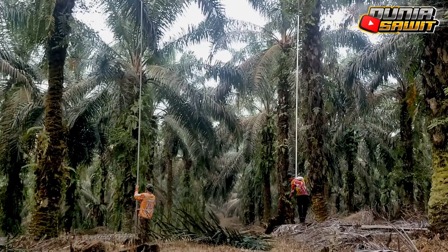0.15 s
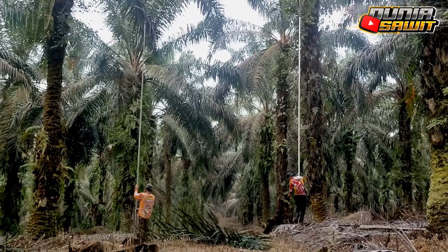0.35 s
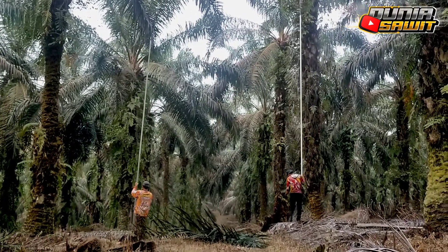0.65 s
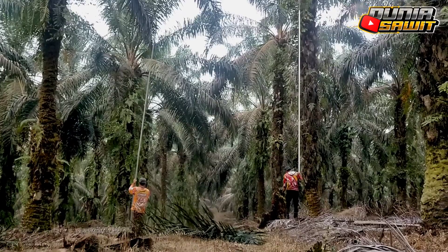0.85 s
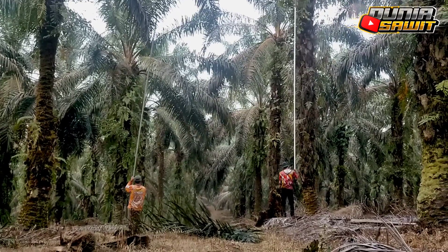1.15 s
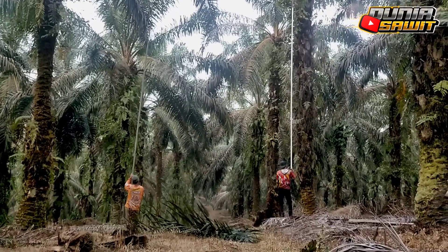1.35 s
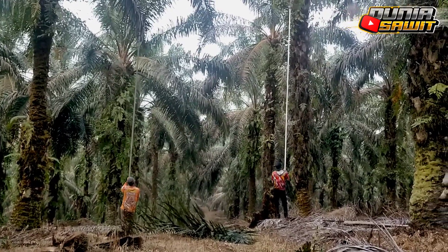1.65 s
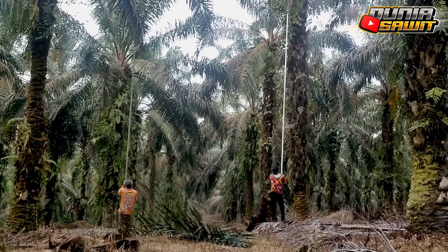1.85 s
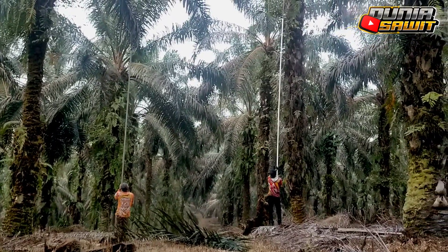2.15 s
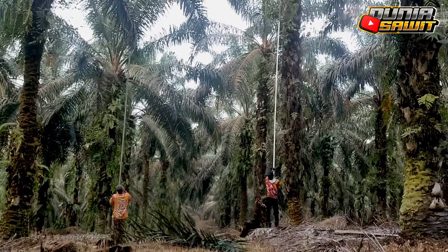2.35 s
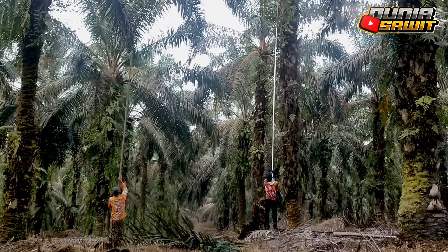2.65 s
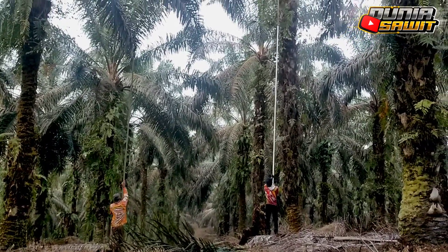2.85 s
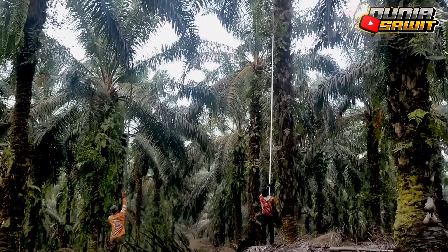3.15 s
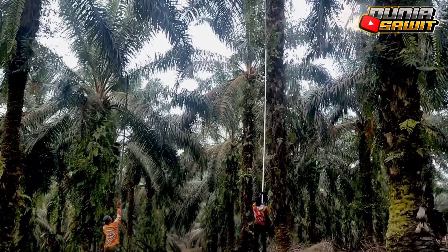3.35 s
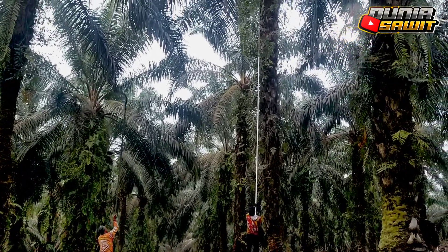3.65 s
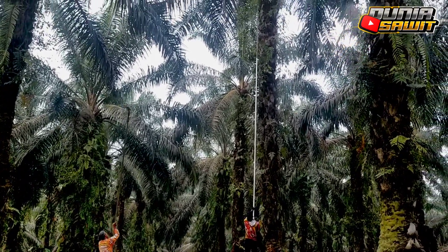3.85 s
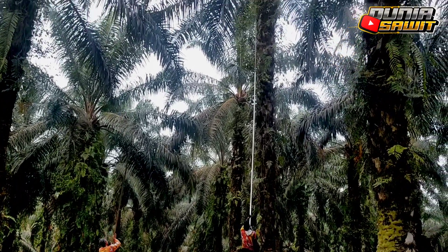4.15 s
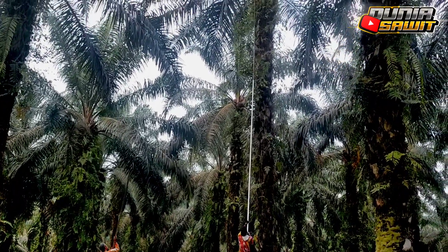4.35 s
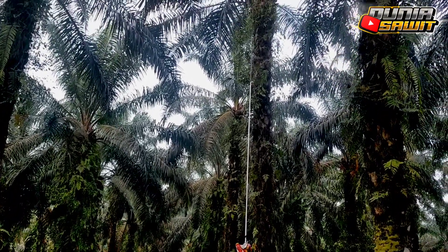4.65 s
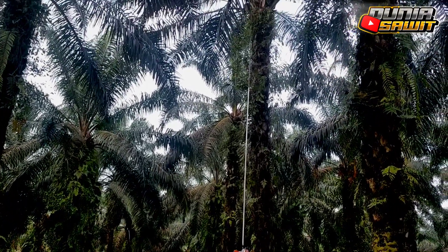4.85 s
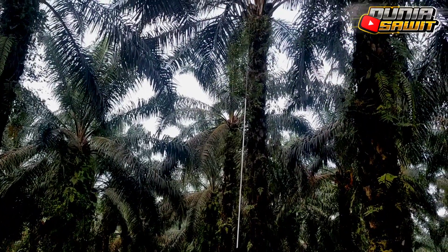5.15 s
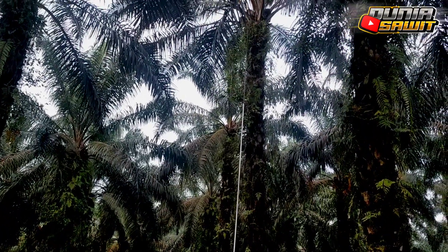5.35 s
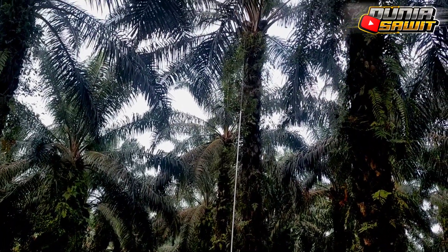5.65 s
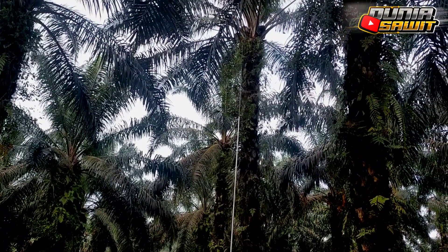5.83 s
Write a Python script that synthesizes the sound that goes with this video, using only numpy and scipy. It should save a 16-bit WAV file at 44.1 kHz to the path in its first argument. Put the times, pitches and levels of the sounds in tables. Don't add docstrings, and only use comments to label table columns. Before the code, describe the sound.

Outdoor recording among tall trunks: first a long bright scrape of steel on leaves with tiny clinks and a bird's rapid trill, then a quieter gap with microphone pops. At about two seconds a sharp chop cracks and shivers metallically. Afterwards come bird chirps, soft rasping pulls, a woody creak with taps, and hard knocks near the end, all over continuous insect buzzing.

```python
import sys
import numpy as np
from scipy import signal
from scipy.fft import rfft, irfft, next_fast_len
from scipy.io import wavfile
from scipy.ndimage import uniform_filter1d

SR = 44100
rng = np.random.default_rng(int(sys.argv[2]) if len(sys.argv) > 2 else 0)


def wav_out(sig):
    wavfile.write(sys.argv[1], SR, np.round(np.clip(np.atleast_2d(sig).T, -1, 1) * 32767).astype(np.int16))


def volts_from_db(level):
    exponent = np.asarray(level, float) / 20
    return 10 ** exponent


N = 264159

# frequency in Hz, level in dB per Hz.
AIR_SPECTRUM = [(30, -8), (59, -7.5), (120, -3.5), (190, -12), (469, -24), (1140, -23.5), (1500, -24.5),
                (2360, -21.5), (2900, -23.5), (3800, -24), (6500, -32), (8200, -31), (11000, -38.5),
                (15500, -35)]
AIR_DB = -64
# start in seconds, hold in seconds, level in dB.
GUSTS = [
    (0.156, 0.55, -62),
    (.9, .03, -61),
    (1.418, .01, -57.5),
    (1.942, 0.3, -59),
    (2.994, 0.49, -61),
    (5.147, .01, -60.5),
    (5.49, .01, -62.5),
]
LULL_DB, GUST_RISE, GUST_FALL = -67, 54, 75
# centre in Hz, width in Hz, level in dB.
CHORUS_BANDS = [(4430, 600, -0.5), (5060, 990, -1), (5560, 1080, -4)]
# frequency in Hz, level in dB.
CHORUS_EDGE = [(3300, -6), (3950, -6), (4200, 0), (7000, -0.5)]
# time in seconds, level in dB.
CHORUS_SWELL = [(0, -63), (1, -65), (1.5, -65.5), (2.3, -64), (3, -65.5), (3.5, -64.5), (4, -66),
                (4.6, -65), (5.2, -67), (6, -66.5)]

# time in seconds, level in dB under its peak.
LONG_PULL = [
    (0, -8),
    (.12, -2),
    (.3, -3),
    (.432, -4),
    (.58, 0),
    (.65, -3.5),
    (.71, -9),
    (.745, -18.5),
    (.9, -34),
]
# leaf hiss, blade ring and stem rasp in dB.
LONG_PULL_PEAKS = (-51.5, -52, -61.5)
# start in seconds, length in seconds, hiss, ring and rasp in dB.
PULLS = [(0.028, 0.14, -75, -70, -58.5), (.46, .12, -75, -70, -58), (.8, 0.079, -76, -73, -70.5),
         (1.3, 0.14, -74.5, -69.5, -81), (1.696, 0.34, -63.5, -63.5, -65.5), (2.578, 0.14, -80, -86, -71.5),
         (2.96, .14, -74, -84, -78), (3.5, .08, -79, -88, -68), (3.586, 0.042, -71, -82, -62.5),
         (3.625, 0.036, -56, -72, -53.5), (4.27, 0.19, -74, -79, -75), (4.68, 0.14, -76.5, -84, -71.5)]
CLIMB_DB, LET_GO = 6.5, 97
# start in seconds, hiss, ring and rasp in dB, fade in dB per second.
JOLTS = [
    (2.747, -70, -77, -64, 43),
    (3.69, -66, -68, -56.5, 92),
    (4.5, -76, -77, -68, 34),
    (5.228, -67, -76, -62.5, 130),
    (5.846, -80, -86, -66, 300),
    (5.897, -83, -84, -57, 92),
]
JOLT_S = 0.4
RING_FOLLOW, RASP_FOLLOW = 0.94, .6
# frequency in Hz, level in dB per Hz.
HISS_SPECTRUM = [(2000, -32), (3300, -8), (5000, -3), (6800, -6), (8300, -1), (10200, -6), (12700, -1.5),
                 (15500, 2.5)]
# frequency in Hz, level in dB per Hz.
RASP_SPECTRUM = [(200, -15), (500, -14), (1100, -7.5), (1600, -3.5), (2300, -0.5), (2900, -2), (3600, -2.5),
                 (5000, -16)]

# start in seconds, end in seconds, seconds between pairs, level in dB.
TRILLS = [
    (.032, .51, .0502, -54.5),
    (0.533, .93, .0517, -55),
    (1.584, 1.93, .0519, -54.5),
    (2.871, 3.33, .0519, -53.5),
]
# start in seconds, level in dB.
STRAYS = [
    (.001, -55),
    (.626, -59),
    (3.316, -52),
    (3.358, -52),
    (3.371, -53),
]
PAIR_GAP_S, PAIR_LEAD_DB = .0146, -2.5
UNEVEN_DB, UNEVEN_PITCH = 1.5, .01
# start in seconds, end in seconds, level in dB.
PHRASES = [
    (0.029, .4, -57.5),
    (2.331, 3.83, -56),
]
TRIPLE_S, TRIPLE_GAP_S, TRIPLE_LEAD_DB = .2385, .0397, -8
OVERTONE_DB, LEAD_OVERTONE_DB = -26, -14
# start in seconds, level in dB, first pitch in Hz, last pitch in Hz, length in seconds.
NOTES = [(1.0, -61, 2540, 2480, 0.022), (1.045, -71, 1780, 1500, 0.047), (1.07, -65, 4000, 3600, 0.019),
         (1.349, -66.5, 1773, 1470, 0.038), (2.566, -63, 1060, 1030, .032), (2.78, -58, 1130, 1210, .026),
         (2.762, -64, 850, 900, .03), (2.512, -66, 2330, 2500, .038), (2.68, -69, 6100, 6500, 0.049),
         (2.71, -66, 5900, 6700, 0.052), (2.811, -61, 3840, 3850, 0.017), (2.828, -62, 3900, 3850, .012),
         (3.062, -60, 2760, 2790, 0.023), (2.82, -68, 3100, 3080, 0.015), (4.03, -61.5, 2800, 2630, 0.022),
         (4.118, -64, 3130, 2970, 0.03), (1.755, -62, 2800, 2810, 0.025), (1.78, -63.5, 2830, 2830, 0.047),
         (1.888, -59, 2870, 2830, 0.038), (4.355, -68, 6200, 6500, 0.038), (4.4, -68, 5900, 6600, .045),
         (4.948, -67, 6100, 6800, 0.073), (5.024, -68, 5960, 6730, 0.039), (5.234, -59.5, 875, 833, 0.066),
         (5.288, -59, 1000, 1190, .04), (2.171, -55, 6120, 4580, 0.031)]
# frequency in Hz, t60 in seconds.
GROVE_DECAY = [(300, .3), (790, .45), (2090, .58), (5510, .6), (9000, .5), (13000, .3)]

# start in seconds, level in dB, pitch in Hz, t60 in seconds.
CLINKS = [(.008, -54, 2850, .1), (.0368, -50.5, 2910, .08), (.0643, -54, 2910, .08),
          (.075, -55.5, 2460, .2), (.09, -55, 2900, .08), (.128, -54, 2240, .06), (0.143, -52, 2800, 0.15),
          (.155, -53, 1650, 0.076), (.305, -58, 1050, 0.049), (.4065, -52, 2240, .05),
          (.463, -56, 2600, 0.091), (.5387, -53, 2850, .08), (.5387, -51.5, 2230, 0.13),
          (.539, -53.5, 1150, 0.09), (.582, -58, 2840, .12), (.592, -52, 2140, .06), (.636, -57, 2900, .12),
          (.66, -50, 2900, 0.076), (.694, -53.5, 2870, .08), (2.138, -43.5, 2840, 0.069),
          (2.313, -57, 2830, .1), (2.645, -57, 2850, 0.06), (2.7, -60, 2800, .06), (2.7, -61, 2750, .08),
          (2.7, -58.5, 693, 0.086), (2.7, -54, 1490, .05), (2.75, -55, 2820, .05),
          (2.785, -60.5, 450, 0.093), (2.911, -64, 2100, .08), (3.655, -44, 960, .03),
          (3.591, -60, 1200, .08), (3.714, -54, 2300, .1), (5.9, -59, 3800, .15), (5.906, -62, 6600, .15),
          (5.943, -58, 3400, .1), (5.853, -58, 1650, .06), (5.918, -58, 1600, .2), (5.93, -56, 3030, .04),
          (5.944, -56, 3000, .04), (5.955, -57, 3000, .08), (1.962, -38.5, 760, .06), (.537, -57, 600, .05),
          (1.702, -60, 603, .06)]
CLINK_ROUGH, CLINK_WIDTH = .55, 220
# start in seconds, hold in seconds, level in dB, pitch in Hz.
FAR_WHISTLES = [(.9, .02, -68, 2510), (1.463, 0.024, -70.5, 2340), (2.5, 0.046, -70, 2360),
                (3.02, 0.081, -67.5, 2340), (3.425, .07, -65, 2330), (3.54, .02, -71, 2200),
                (3.87, 0.079, -67, 2350), (4.236, 0.1, -67.5, 2360), (4.927, 0.034, -66, 2375),
                (5.13, .01, -80, 2390), (5.58, 0.11, -70.5, 2360), (5.79, .04, -81, 2420)]
# start in seconds, hold in seconds, level in dB, pitch in Hz.
THIN_WHISTLES = [
    (.8, .2, -74, 3650),
    (5.158, 0.16, -72.5, 3670),
]
FAR_RISE, FAR_FALL = 180, 140
FAR_WANDER = .018
# start in seconds, peak in dB, brightness in Hz.
SNAPS = [(.841, -48, 10500), (1.0494, -51, 10500), (1.079, -42.5, 7350), (1.375, -54, 9000),
         (1.703, -54, 9000), (1.961, -28, 11000), (2.75, -46.5, 8000), (1.948, -32, 11000),
         (1.953, -33, 12000), (1.958, -34, 9500), (1.9642, -32, 8000), (1.968, -35, 13000),
         (2.7806, -50, 11000), (3.5932, -56, 11000), (3.6157, -48, 11000), (3.63, -45, 10000),
         (3.7319, -48, 11000), (3.777, -52, 9000), (3.93, -58, 11000), (4.5506, -54, 11000),
         (5.2699, -51, 11000), (4.298, -56, 10000), (4.4178, -51, 10000), (4.4932, -47.5, 8000),
         (4.7855, -54, 10000), (5.236, -49, 12000), (5.3296, -43, 6000), (5.3305, -46, 4000),
         (2.795, -52, 5000), (2.818, -53, 6000), (2.974, -57, 10000), (5.851, -57, 10000),
         (5.904, -51, 12500), (5.9863, -39, 9000)]
# start in seconds, peak in dB, rate of swing in Hz.
POPS = [(1.115, -38.5, 1330), (1.11578, -45, 1300), (1.1185, -53, 700), (1.28, -58, 708), (2.326, -56, 425),
        (3.279, -39, 1290), (3.958, -39, 1120), (4.066, -49, 1050), (4.191, -51.5, 1050),
        (5.1341, -39.5, 1400), (5.1366, -50, 700), (5.4338, -52, 900), (5.4358, -45.5, 937),
        (5.4648, -38.5, 1370), (3.0595, -58, 1500), (5.9851, -41, 1500), (5.985, -40, 5500)]
# start in seconds, hold in seconds, level in dB, resonance in Hz, roughness 0-1.
CREAKS = [(1.663, .004, -72, 700, 0.2), (2.69, 0.041, -67, 790, 0.55), (2.781, 0.013, -64, 1144, 0.5),
          (3.61, .008, -61, 1080, .4), (3.62, 0.014, -54, 1060, 0.44), (3.642, 0.035, -49, 1130, 0.3),
          (3.711, .006, -63, 1010, .4), (4.461, 0.011, -65, 1100, .1), (4.505, 0.014, -58.5, 1020, .6),
          (4.525, 0.0095, -53.5, 960, 0.66), (5.329, 0.098, -66, 1070, 0.2)]
CREAK_RISE, CREAK_FALL = 630, 820
CREAK_WANDER = .05
# start in seconds, level in dB, centre in Hz, width in Hz, t60 in seconds.
SCUFFS = [(1.698, -56, 1200, 830, 0.2), (1.799, -61, 1000, 1600, 0.18), (2.748, -56.5, 2700, 3400, 0.06),
          (2.775, -60, 2200, 3000, .12), (2.698, -62, 1700, 2400, .07), (4.292, -57.5, 990, 610, 0.13),
          (1.942, -43, 13000, 10000, 0.17), (4.54, -61, 1330, 1050, 0.44), (3.635, -60, 770, 480, 0.25),
          (1.7, -63.5, 720, 400, .2), (1.938, -51.5, 560, 630, 0.073), (1.947, -42.5, 720, 310, 0.094),
          (5.336, -55, 2100, 1600, 0.26), (5.897, -58, 3600, 2500, .16), (5.841, -60, 2200, 1200, .05),
          (5.37, -58, 2000, 1500, .25)]

# start in seconds, hold in seconds, level in dB, rise and fall in dB per second.
BITE = [
    (1.939, .008, -47, 6000, 900),
    (1.949, .019, -36, 2500, 1700),
    (1.972, .03, -45.5, 900, 220),
]
# frequency in Hz, level in dB per Hz.
TEAR_SPECTRUM = [(120, -45), (250, -18), (450, -23), (800, -11), (1600, -2.5), (2800, -8), (3300, -13),
                 (4200, -11), (6000, -13.5), (7100, -16.5), (8100, -11), (9500, -20.5), (12000, -28),
                 (15500, -20.5)]
STRIKE_S, HELD_S = 1.948, .021
# frequency in Hz, level in dB, t60 in seconds.
POLE_MODES = [(278, -59, 0.099), (450, -51.5, 0.044), (1124, -43, 0.042), (1218, -46, 0.11),
              (1393, -49.5, 0.27), (1616, -48, 0.03), (2100, -51, .15), (2200, -51, 0.11),
              (2390, -50, 0.15), (2570, -63, .2), (6050, -48, 0.039), (8060, -46, 0.068), (8106, -45, 0.05)]
# frequency in Hz, level in dB, t60 in seconds.
BEATING_PAIR = [(2747, -38, .27), (2803, -38, .27)]
# frequency in Hz, level in dB, t60 in seconds, sag in dB.
DRIVEN_MODE = (2803, -27, .02, -11)
# start in seconds, level in dB.
REBOUNDS = [
    (1.942, -40),
    (2.032, -39.5),
    (2.07, -49),
]
# start in seconds, level in dB, pitch in Hz, t60 in seconds.
TAPS = [(3.6778, -38.5, 996, 0.028), (3.7085, -53, 1030, .05), (3.7295, -43.5, 993, .04),
        (3.7375, -54, 900, 0.037), (5.225, -55, 2250, .02), (5.229, -56, 1050, .04),
        (5.3285, -42, 2300, .015), (5.3415, -49, 2200, 0.037), (5.345, -49, 1640, 0.034),
        (5.382, -54, 1900, .05), (5.8945, -48, 2400, 0.045), (5.8955, -50, 1600, .03),
        (5.9065, -49, 2390, .03), (5.906, -47, 1600, .03), (5.912, -48, 1600, .03), (5.92, -52, 1055, .04),
        (5.928, -53, 1080, .05), (5.98635, -32, 2300, .0065), (1.9425, -41, 8100, .06),
        (1.9445, -42, 2800, .03), (1.9475, -36, 1090, .04), (1.9485, -37, 800, .03),
        (1.9573, -33, 2150, .04), (1.9565, -35, 8100, .05), (1.9625, -35, 780, .05),
        (1.9635, -33, 1640, .04), (2.09, -52, 8100, .04), (5.855, -58, 1080, .07), (5.866, -57, 1630, .05)]
# centre in Hz, width in Hz, level in dB, t60 in seconds.
SHIVER_MODES = [(2845, 150, -54, .8), (2390, 83, -53.5, 1), (2096, 90, -56, 0.7), (1980, 60, -59, 1),
                (1533, 89, -52, .7), (2560, 90, -55, 0.68), (8100, 380, -49.5, 0.53), (647, 40, -65, 0.96),
                (2260, 70, -51, 0.43), (1836, 70, -55, .5), (1184, 90, -58, .4), (872, 70, -56, 0.41)]

# start in seconds, end in seconds, level in dB.
ROLLS = [
    (2.512, 2.577, -68),
    (5.52, 5.595, -69),
    (5.682, 5.76, -66.5),
]
TICK_S = .0133
# start in seconds, level in dB, pitch in Hz, length in seconds.
CHIRRUPS = [
    (2.638, -69, 2800, 0.02),
    (3.003, -61.5, 2200, 0.017),
    (3.2515, -61.5, 2650, 0.026),
    (3.327, -57, 2675, 0.028),
    (3.359, -60, 2800, 0.015),
    (3.4, -56.5, 2640, 0.03),
    (3.502, -58, 2500, 0.023),
    (4.078, -61.5, 2660, 0.027),
]
ZIGZAG_PER_S, ZIGZAG_HZ = 88, 260
# start in seconds, level in dB, low mode in Hz, high mode in Hz,
# high mode above low in dB.
KNOCKS = [
    (5.3296, -33, 1627, 2100, -2.5),
    (5.8455, -44, 1076, 1620, -4.5),
    (5.8985, -46, 1060, 1610, 1),
]
KNOCK_CYCLES, KNOCK_HELD_S = 24, .0032


def rms_one(x):
    return x / np.sqrt(np.mean(x ** 2) + 1e-20)


def read(points, hz):
    f, value = np.transpose(points)
    return np.interp(np.log(hz + 1), np.log(f + 1), value)


def played(points):
    return np.interp(np.arange(N) / SR, *np.transpose(points))


def held(s, hold, db, rise, fall, depth=30):
    return [(s - depth / rise, db - depth), (s, db), (s + hold, db), (s + hold + depth / fall, db - depth)]


def stepped(rows, column):
    return played([(row[0] + end * row[1], row[column]) for row in rows for end in (0, 1)])


def level(curves, silence_db=-150):
    out = np.full(N, float(silence_db))
    for curve in curves:
        s, db = np.transpose(curve)
        at = np.arange(max(round(s[0] * SR), 0), min(round(s[-1] * SR), N))
        out[at] = np.maximum(out[at], np.interp(at / SR, s, db))
    return uniform_filter1d(volts_from_db(out), size=150)


def drift(size):
    smooth = uniform_filter1d(rng.standard_normal(N), size=size)
    return rms_one(uniform_filter1d(smooth, size=size))


def coloured(x, points):
    size = next_fast_len(len(x))
    gain = volts_from_db(read(points, np.fft.rfftfreq(size, 1 / SR)))
    return rms_one(irfft(rfft(x, size) * gain, size)[:len(x)])


def band(x, hz, width):
    shape = signal.iirpeak(hz, hz / width, SR)
    return rms_one(signal.lfilter(*shape, signal.lfilter(*shape, x)))


def resonate(x, hz, width):
    turn = np.exp(2j * np.pi * np.cumsum(hz) / SR)
    r = np.exp(-np.pi * width / SR)
    return rms_one((turn * signal.lfilter([1], [1, -2 * r, r * r], x * turn.conj())).real)


def grit(per_s, spread_db, smooth):
    sizes = volts_from_db(spread_db * np.minimum(rng.exponential(1, N), 5))
    slips = sizes * (rng.random(N) < per_s / SR)
    return rms_one(rms_one(slips * rng.standard_normal(N)) + smooth * rng.standard_normal(N))


def ring(hz, db, t60, rise=0.00044, held=0, sag_db=0):
    t = np.arange(round((held + t60) * SR)) / SR
    fall_db = sag_db * np.minimum(t / (held + 1e-9), 1) - 60 * np.maximum(t - held, 0) / t60
    return volts_from_db(db + fall_db) * np.sin(2 * np.pi * hz * t) * (1 - np.exp(-t / rise))


def note(db, from_hz, to_hz, length, overtone_db=-90):
    turns = 2 * np.pi * np.cumsum(np.linspace(from_hz, to_hz, round(length * SR))) / SR
    return volts_from_db(db) * np.hanning(len(turns)) * (np.sin(turns) + volts_from_db(overtone_db) * np.sin(2 * turns))


def add(mix, s, sound):
    part = mix[round(s * SR):][:len(sound)]
    part += sound[:len(part)]


def air(patchy_db=2.5):
    frames, hz = N // 256 + 5, np.fft.rfftfreq(1024, 1 / SR)
    a, b, patches = rng.standard_normal((frames, 513, 3)).T
    patches = uniform_filter1d(patches, size=10, axis=0)
    patches = rms_one(uniform_filter1d(patches, size=12, axis=1))
    z = (a + 1j * b) * volts_from_db(read(AIR_SPECTRUM, hz)[:, None] + patchy_db * patches)
    return volts_from_db(AIR_DB) * rms_one(signal.istft(z, nperseg=1024, noverlap=768)[1][:N])


def wind():
    spectrum = [(8, 0.0), (22, -1.0), (50, -12.5), (100, -21.0), (250, -45.5)]  # Hz, dB
    low = coloured(rng.standard_normal(N), spectrum)
    return low * level([held(*gust, GUST_RISE, GUST_FALL) for gust in GUSTS], LULL_DB) * volts_from_db(-1.5)


def insects():
    bands = sum(volts_from_db(db) * band(grit(5000, 2.7, 0.72), hz, width) for hz, width, db in CHORUS_BANDS)
    return coloured(bands, CHORUS_EDGE) * volts_from_db(played(CHORUS_SWELL))


def strokes():
    moves = [(LONG_PULL, LONG_PULL_PEAKS)]
    for s, length, *peaks in PULLS:
        end = s + length
        moves.append(([(s, -CLIMB_DB), (end, 0), (end + 30 / LET_GO, -30)], peaks))
    for s, *peaks, fade in JOLTS:
        end, low = s + JOLT_S, -fade * JOLT_S
        moves.append(([(s, 0), (end, low), (end + 30 / LET_GO, low - 30)], peaks))
    return [level([[(s, peaks[k] + follow * db) for s, db in pressure] for pressure, peaks in moves])
            for k, follow in enumerate((1, RING_FOLLOW, RASP_FOLLOW))]


def rubbing():
    slips = grit(6000, 2, 1.2)
    hiss_gain, ring_gain, rasp_gain = strokes()
    flurry = volts_from_db(1.7 * drift(size=700))
    blade = rms_one(band(slips, 8100, 600) + band(slips, 8560, 1200)) * volts_from_db(2.2 * drift(size=900))
    blade += volts_from_db(-6.5 + 2.5 * drift(size=900)) * band(slips, 15400, 250)
    pole = sum(volts_from_db(db + 0.5 + 4.7 * drift(size=2500)) * band(slips, hz, 260)
               for hz, db in [(1600, -9.5), (2220, -7), (2850, -4.0)])
    steel = volts_from_db(-2.0) * ring_gain * (blade + volts_from_db(-13) * pole)
    hiss = volts_from_db(6.5) * hiss_gain * coloured(slips, HISS_SPECTRUM) * flurry
    rasp = rasp_gain * flurry * coloured(grit(2500, 2.2, 1.45), RASP_SPECTRUM)
    return hiss + steel + rasp


def birds():
    out = np.zeros(N)
    pair_chirp = (4640, 3830, .0148, -90)
    chirps = [(s, db, *pair_chirp) for s, db in STRAYS]
    for start, end, step, db in TRILLS:
        for s in np.arange(start, end, step):
            chirps += [(s + k * PAIR_GAP_S, db + (1 - k) * PAIR_LEAD_DB, *pair_chirp) for k in (0, 1)]
    for start, end, db in PHRASES:
        for first in np.arange(start, end, TRIPLE_S):
            for k in range(3):
                s = first + k * TRIPLE_GAP_S
                octave_db = OVERTONE_DB if k else LEAD_OVERTONE_DB
                if s < end:
                    chirps.append((s, db + (k == 0) * TRIPLE_LEAD_DB, 6100, 4600, .03, octave_db))
    uneven = rng.standard_normal((len(chirps), 2))
    for (s, db, from_hz, to_hz, length, octave_db), (loud, high) in zip(chirps, uneven):
        bend = 1 + UNEVEN_PITCH * high
        add(out, s, note(db + UNEVEN_DB * loud, from_hz * bend, to_hz * bend, length, octave_db))
    for s, *shape in NOTES:
        add(out, s, note(*shape))
    return out


def grove(x):
    echoes, at = np.zeros(SR), np.arange(300, SR - 20, 20)
    echoes[at + rng.integers(0, 20, len(at))] = rng.choice([-1., 1.], len(at))
    hz, t, z = signal.stft(echoes, SR, nperseg=256)
    t60 = np.clip(read(GROVE_DECAY, hz), .15, .9)[:, None]
    tail = signal.istft(z * volts_from_db(-60 * t / t60), SR, nperseg=256)[1]
    return signal.fftconvolve(x, tail / np.linalg.norm(tail))[:N]


def clinks():
    out, t = np.zeros(N), np.arange(9000) / SR
    for (s, db, hz, t60), rattle in zip(CLINKS, rng.standard_normal((len(CLINKS), len(t)))):
        fade = volts_from_db(db - 60 * t / t60) * np.minimum(t / .002, 1)
        add(out, s, (1 - CLINK_ROUGH) * ring(hz, db, t60, rise=0.0017))
        add(out, s, CLINK_ROUGH * fade * band(rattle, hz, CLINK_WIDTH))
    return out


def far_birds():
    out, blur = np.zeros(N), grit(600, 2.5, 1.5)
    for calls in (FAR_WHISTLES, THIN_WHISTLES):
        gain = level([held(s, hold, db, FAR_RISE, FAR_FALL) for s, hold, db, hz in calls])
        hz = stepped(calls, column=3) * (1 + FAR_WANDER * drift(size=600))
        out += gain * volts_from_db(-2.5) * resonate(blur, hz, 150)
    return out


def snaps():
    out, t = np.zeros(N), np.arange(500) / SR
    for (s, db, hz), burst in zip(SNAPS, rng.standard_normal((len(SNAPS), len(t)))):
        add(out, s, volts_from_db(db - 8.5 - 60 * t / 0.016) * band(burst, hz, 7800))
    return out


def pops():
    out, t = np.zeros(N), np.arange(-60, 120) / SR
    for s, db, hz in POPS:
        u = t * hz * 5.67
        swing = volts_from_db(db + 3.5) * u * np.exp(-u ** 2 / 2)
        add(out, s, swing)
        add(out, s + 0.00194, 0.13 * swing)
    return out


def creaks():
    hz, slips = stepped(CREAKS, column=3), grit(1500, 2, .8)
    rough = np.clip(stepped(CREAKS, column=4), 0, 1)
    broad = resonate(slips, hz * (1 + CREAK_WANDER * drift(size=300)), 550)
    broad = broad + 0.38 * band(slips, 490, 150) + 0.4 * band(slips, 1510, 730)
    gain = level([held(s, hold, db, CREAK_RISE, CREAK_FALL) for s, hold, db, *_ in CREAKS])
    return gain * rms_one(rough * broad + (1 - rough) * resonate(slips, hz, 180))


def scuffs():
    out, t = np.zeros(N), np.arange(9000) / SR
    for (s, db, hz, width, t60), puff in zip(SCUFFS, rng.standard_normal((len(SCUFFS), len(t)))):
        add(out, s, volts_from_db(db - 60 * t / t60) * (1 - np.exp(-t / 0.0011)) * band(puff, hz, width))
    return out


def chop():
    tear = volts_from_db(-.7) * level([held(*row) for row in BITE]) * coloured(grit(7000, 2.3, 1.1), TEAR_SPECTRUM)
    metal = np.zeros(N)
    for hz, db, t60 in POLE_MODES + BEATING_PAIR:
        add(metal, STRIKE_S, ring(hz, db, t60, held=HELD_S))
    add(metal, STRIKE_S, ring(*DRIVEN_MODE[:3], held=HELD_S, sag_db=DRIVEN_MODE[3]))
    for s, db in REBOUNDS:
        add(metal, s, ring(8150, db, 0.036))
    return tear, metal


def taps():
    out = np.zeros(N)
    for s, db, hz, t60 in TAPS:
        add(out, s, ring(hz, db, t60, rise=.0003))
    return out


def shiver():
    out, t = np.zeros(N), np.arange(round(.6 * SR)) / SR
    rattles = rng.standard_normal((len(SHIVER_MODES), len(t)))
    for (hz, width, db, t60), rattle in zip(SHIVER_MODES, rattles):
        add(out, STRIKE_S + HELD_S, volts_from_db(db - 60 * t / t60) * band(rattle, hz, width))
    return out


def cricket():
    out = np.zeros(N)
    for start, end, db in ROLLS:
        for s in np.arange(start, end, TICK_S):
            add(out, s, note(db + 1.9 * rng.standard_normal(), 6330, 5800, .008))
    return out


def chirrups():
    out = np.zeros(N)
    for s, db, hz, length in CHIRRUPS:
        t = np.arange(round(length * SR)) / SR
        zigzag = ZIGZAG_HZ / ZIGZAG_PER_S * np.sin(2 * np.pi * ZIGZAG_PER_S * t)
        add(out, s, volts_from_db(db) * np.hanning(len(t)) * np.sin(2 * np.pi * hz * t - zigzag))
    return out


def knocks():
    out, t = np.zeros(N), np.arange(300) / SR
    cracks = rng.standard_normal((len(KNOCKS), len(t)))
    for (s, db, low_hz, high_hz, high_db), crack in zip(KNOCKS, cracks):
        t60 = KNOCK_CYCLES / low_hz
        add(out, s, ring(low_hz, db, t60, held=KNOCK_HELD_S))
        add(out, s, ring(high_hz, db + high_db, 0.68 * t60, held=KNOCK_HELD_S / 2))
        add(out, s, volts_from_db(db - 16 - 60 * t / 0.056) * band(crack, 1830, 2000))
    return out


def scene():
    bed = air() + wind() + insects() + far_birds() + cricket()
    song, calls = volts_from_db(1.5) * birds(), chirrups()
    tear, metal = chop()
    hits = knocks() + taps() + snaps() + scuffs()
    sent = volts_from_db(-2.5) * tear + volts_from_db(-19) * metal + volts_from_db(-15) * hits + volts_from_db(-13) * song + volts_from_db(-4) * calls
    work = rubbing() + creaks() + pops() + clinks() + shiver()
    return (tear + metal + hits + song + calls + grove(sent) + work + bed)[None]


def roll_off(x):
    return signal.sosfilt(signal.butter(12, 16570, fs=SR, output="sos"), x)


def record(dry):
    hz, t, z = signal.stft(dry, SR, nperseg=2048)
    local_db = 10 * np.log10(uniform_filter1d(abs(z) ** 2, size=7, axis=1) + 1e-30)
    faint = (local_db < -110.2) & (hz[:, None] > 10800) & (hz[:, None] < 14800)
    thinned = signal.istft(z * np.where(faint, .12, 1), SR, nperseg=2048)[1][:, :N]
    edge = signal.firwin(511, 15530, window=("kaiser", 9), fs=SR)
    mix = signal.oaconvolve(thinned, edge[None], "same")
    return roll_off(mix)


dry = scene()
out = record(dry)
wav_out(out)
```